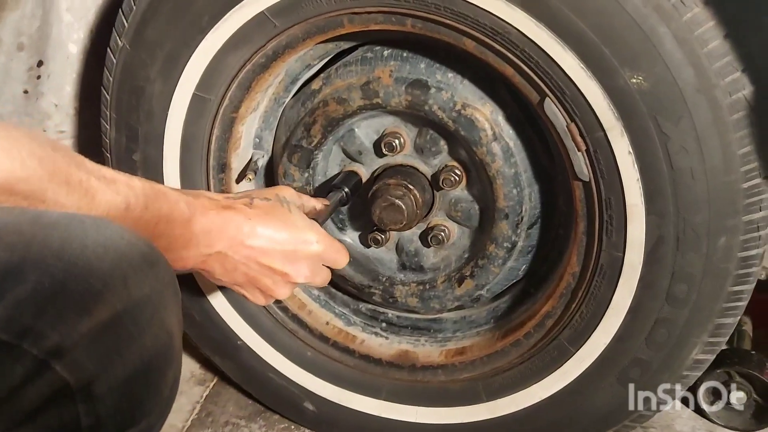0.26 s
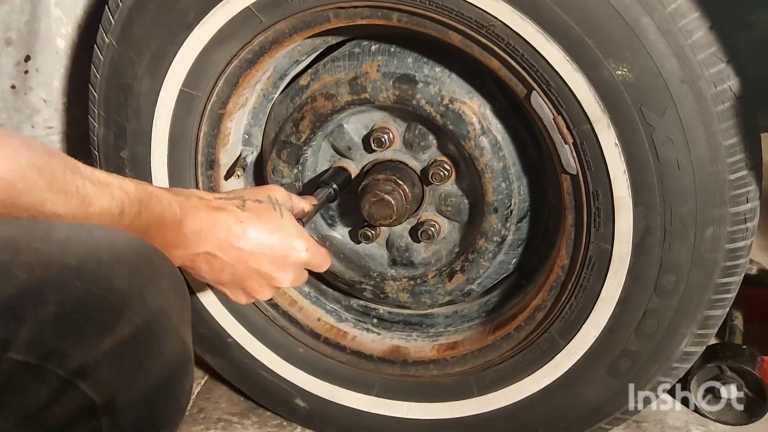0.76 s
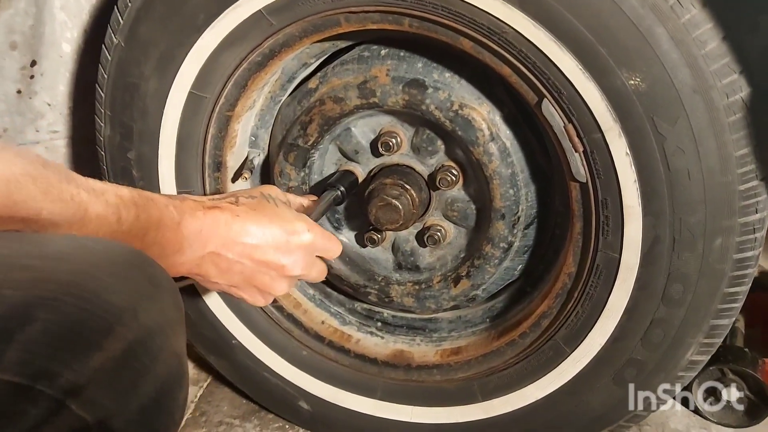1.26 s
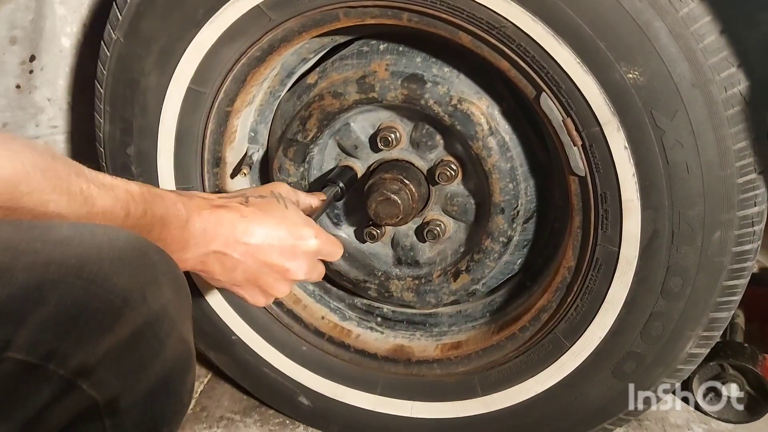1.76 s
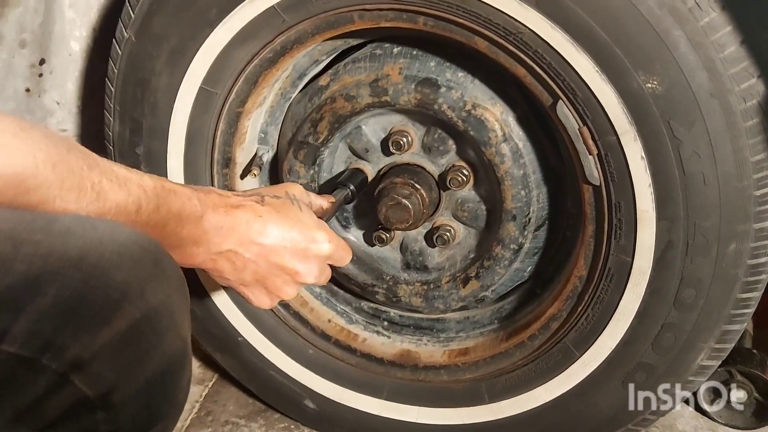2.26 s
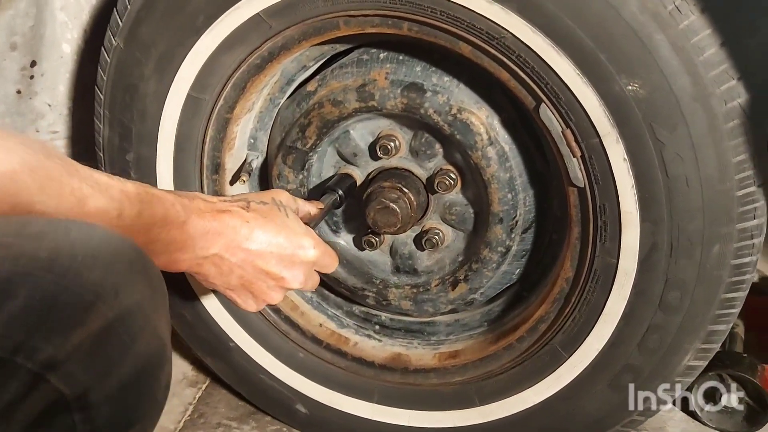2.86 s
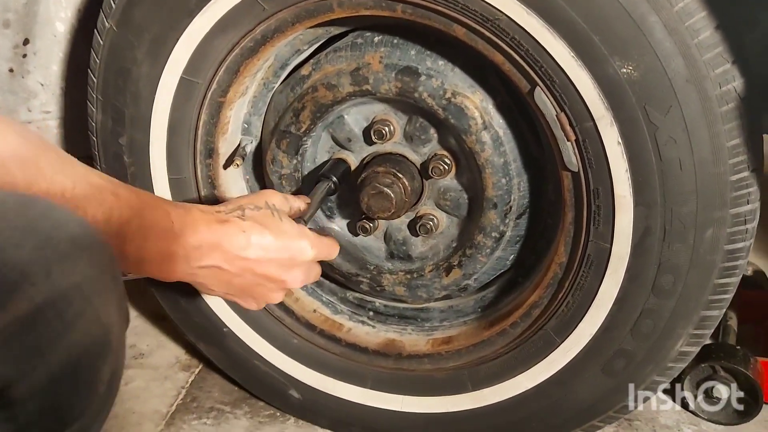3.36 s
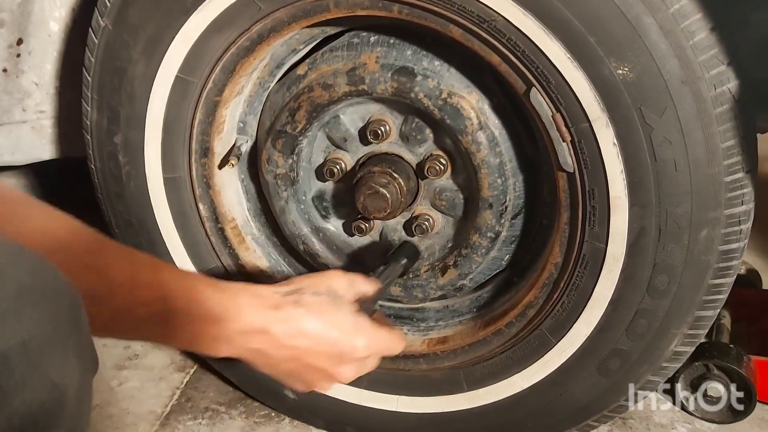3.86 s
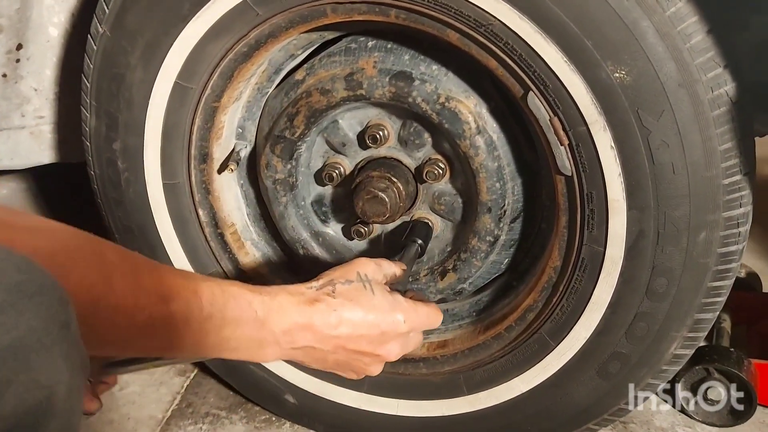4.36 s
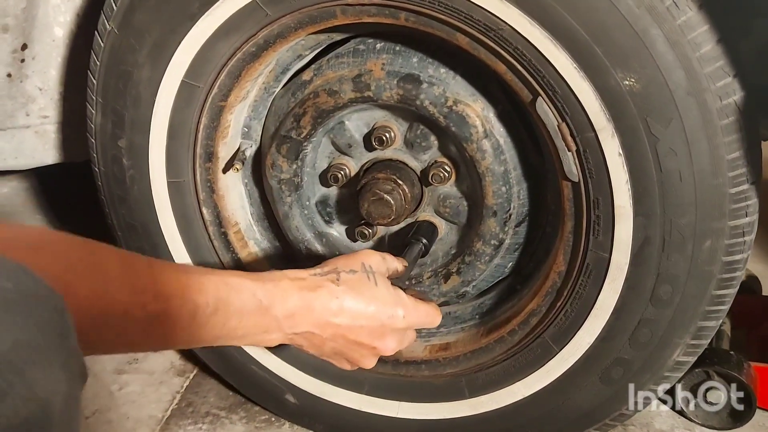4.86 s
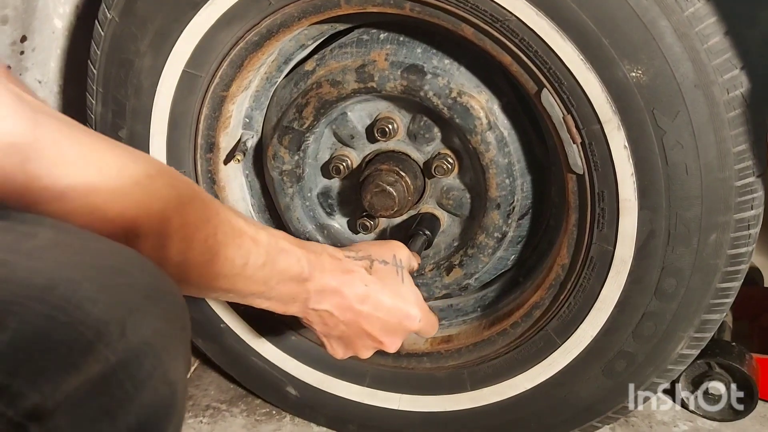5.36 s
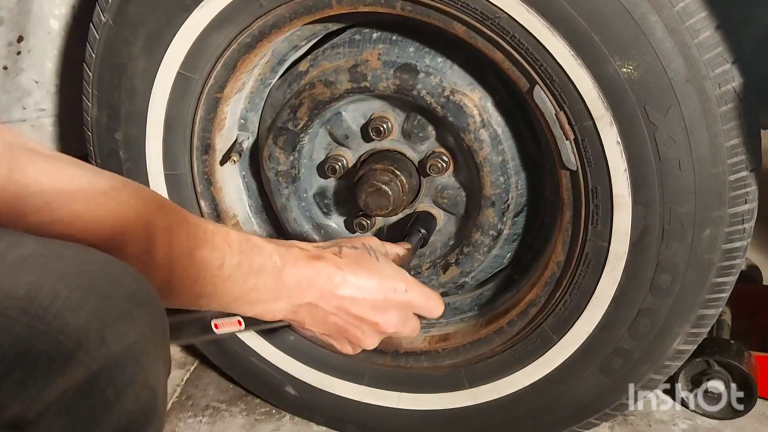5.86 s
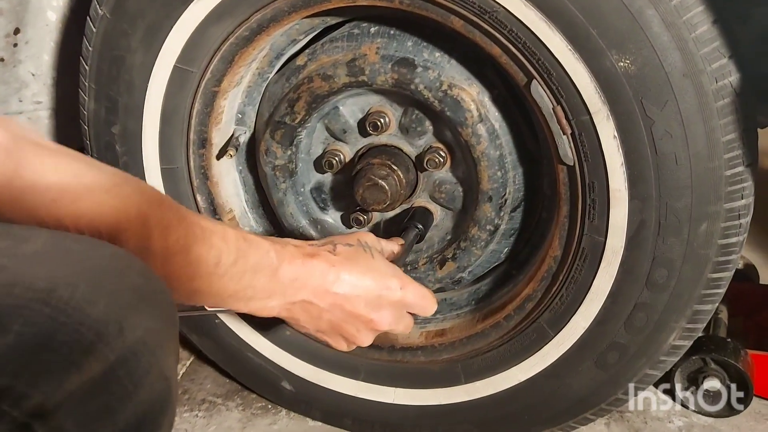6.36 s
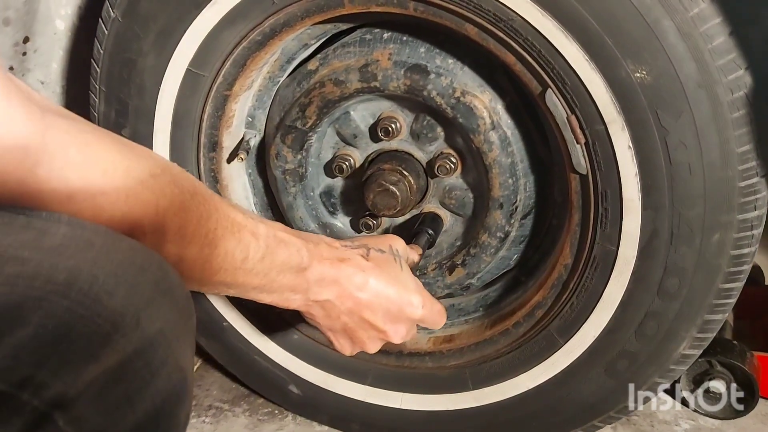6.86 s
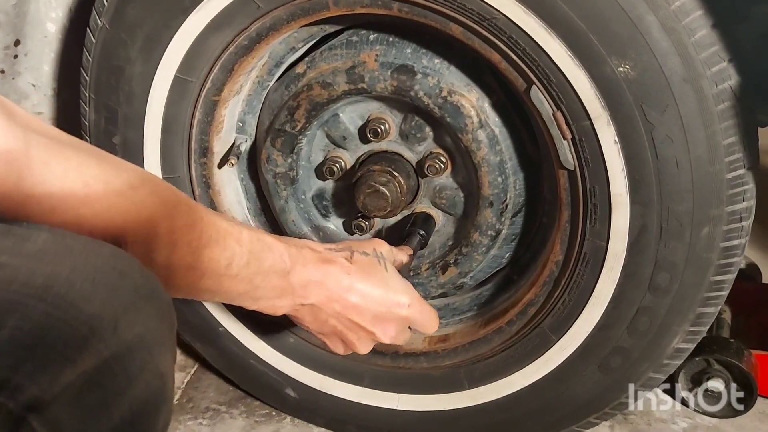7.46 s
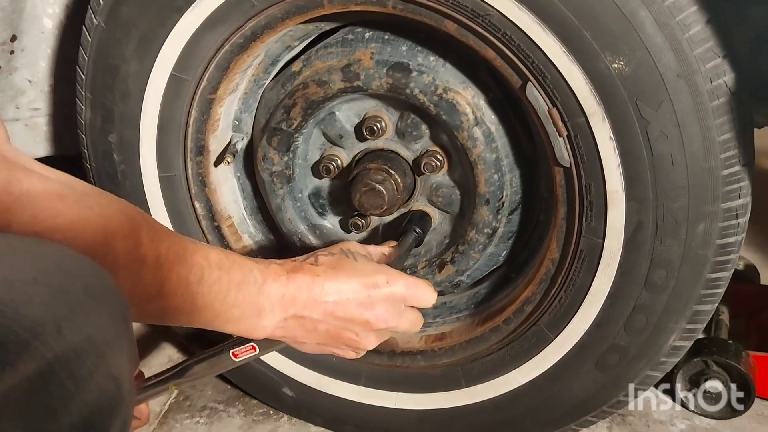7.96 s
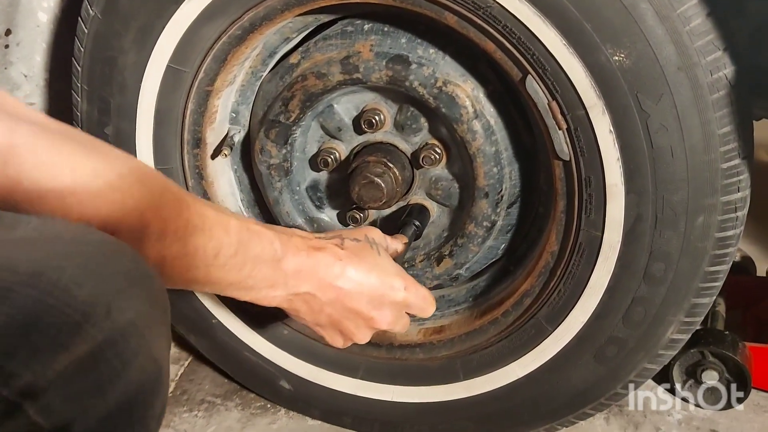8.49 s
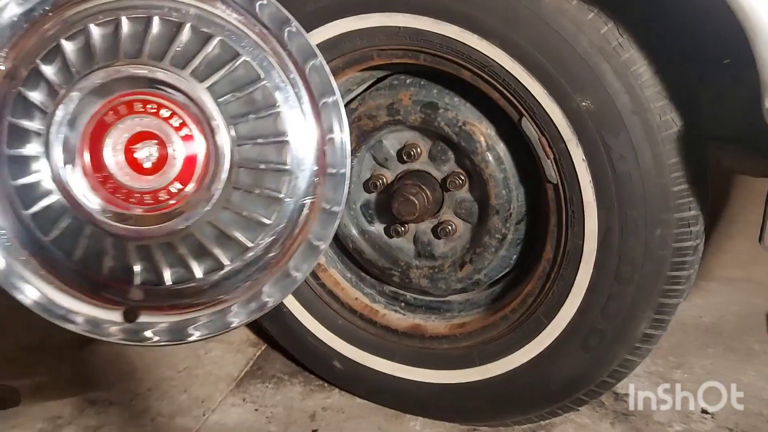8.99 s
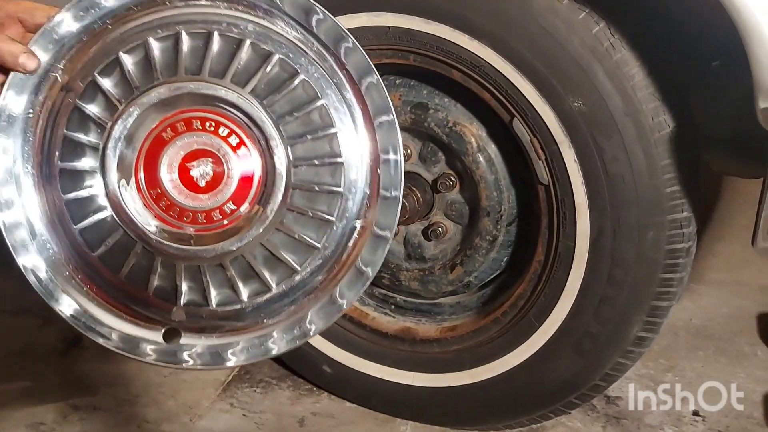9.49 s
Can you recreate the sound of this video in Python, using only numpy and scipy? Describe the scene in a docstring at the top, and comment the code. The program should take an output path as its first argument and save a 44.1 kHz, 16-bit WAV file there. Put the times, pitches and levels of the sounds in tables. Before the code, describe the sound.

Sharp metallic wrench clicks and hard steel clanks on a car wheel over faint traffic wash, then light hub cap rattles and a low engine drone.

```python
"""A click-type wrench tightens the nuts of a steel car wheel in an open garage; later a hub cap is knocked.
Pawl and socket are dying chatters of noise that ring crowds of steel modes; heavy blows thump the tyre.
Low rim modes and dull knocks are struck resonators; diffuse echoes are noise dying band by band.
The worker's moves and the traffic wash are shaped noise; an engine drones as a throbbing near sine.
A short silence separates the two scenes."""
import sys
import numpy as np
from scipy import signal
from scipy.io import wavfile
from scipy.ndimage import uniform_filter1d

SR = 44100
rng = np.random.default_rng(int(sys.argv[2]) if len(sys.argv) > 2 else 0)


def pcm_store(signal):
    """Save signal as 16-bit PCM."""
    levels = np.round(np.clip(np.atleast_2d(signal), -1, 1) * 32767)
    wavfile.write(sys.argv[1], SR, levels.astype(np.int16).T)


N = 428916

# crowds of close modes of wrench and wheel: (f/Hz, width/Hz, level/dB)
STEEL_CROWDS = [(1870, 170, -4), (2210, 220, -3), (2870, 150, -9), (5100, 250, -7), (5900, 200, -9),
                (8780, 400, -9), (10900, 500, -11), (3666, 90, -8), (4100, 140, -12), (4400, 200, -2),
                (4850, 100, -10), (7230, 170, -2), (7680, 150, -6)]
STEEL_T60_S = 0.23
# the pause between the scenes: (start t/s, end t/s)
PAUSE_S = (8.892, 8.989)
CREST = 1.94   # peak over rms of a noisy contact
KNOCK_LEAN_DB = 1.5   # left over right, for knocks, rim and boom
STEP = 40   # samples between the values of a slow curve
SIDES = np.array([[1], [-1]])   # sign of a difference signal at the left and right port


def amp(db):
    """Level definition: the amplitude ratio of a level in dB."""
    return 10 ** (np.asarray(db) / 20)


def rms_one(x):
    """Power normalisation: scaled to rms 1."""
    return x / np.sqrt(np.mean(x ** 2) + 1e-20)


def peak_one(x):
    """Peak normalisation: scaled to peak 1."""
    return x / np.abs(x).max()


def fitted_to(x, shape):
    """Crest factor: noise scaled by its rms so that its peaks typically touch the envelope."""
    return x * np.sqrt(np.mean(shape ** 2) / np.mean(x ** 2)) / CREST


def lean(db):
    """Intensity stereo: left and right gains of a level difference."""
    return amp(db / 2 * SIDES)


def add(out, s, sound):
    """Superposition: mixes a stereo sound in at time s."""
    at = round(s * SR)
    out[:, at:at + sound.shape[1]] += sound[:, :N - at]


def in_time(tables):
    """Linear interpolation: columns of consecutive curve tables, one value a sample."""
    s, *columns = np.vstack(tables).T
    return [np.interp(np.arange(N) / SR, s, c) for c in columns]


def at_hz(points, hz):
    """Logarithmic pitch scale: a spectrum read on a log-frequency axis."""
    f, value = np.array(points).T
    return np.interp(np.log(hz), np.log(f), value)


def dying(t60, attack_s):
    """Exponential decay: half a second of quick rise and fall; a t60 below 4 ms counts as 4 ms."""
    t = np.arange(SR // 2) / SR
    return (1 - np.exp(-t / attack_s)) * amp(-60 * t / max(t60, .004)) + 1e-18


def band(x, low_hz, high_hz):
    """Band limitation: Butterworth band-pass."""
    return signal.sosfilt(signal.butter(2, [low_hz, high_hz], "band", fs=SR, output="sos"), x)


def resonance(x, hz, width_hz):
    """Damped resonance: two poles, gain 1 on top."""
    r = np.exp(-np.pi * width_hz / SR)
    feedback = [1, -2 * r * np.cos(2 * np.pi * hz / SR), r * r]
    return signal.lfilter((1 - r * r) / 2 * np.array([1, 0, -1]), feedback, x)


def ring(force, modes, spread_db):
    """Modal superposition: the force sets every mode ringing, with strengths new for each blow."""
    out = 0
    for (hz, db, t60), luck in zip(modes, rng.standard_normal(len(modes))):
        r, w = amp(-60 / (t60 * SR)), 2 * np.pi * hz / SR
        mode = signal.lfilter([0, np.sin(w)], [1, -2 * r * np.cos(w), r * r], force)
        out = out + amp(db + spread_db * luck) * mode
    return peak_one(out)


def drift(rate):
    """Low-passed random fluctuation of spread 1, a value every STEP samples."""
    r = np.exp(-2 * np.pi * rate * STEP / SR)
    lead_in = 2000
    slow = signal.lfilter([1], [1, -2 * r, r * r], rng.standard_normal(N // STEP + lead_in + 1))
    return rms_one(slow[lead_in:lead_in + len(range(0, N, STEP))])


def layered_noise(layers, patchy_db):
    """Power addition of incoherent layers (spectrum, level curve) in flickering half-octave stereo bands."""
    # left-right correlation: (f/Hz, correlation)
    likeness = [(60, 0.98), (180, 0.92), (550, 0.43), (1650, -0.27), (4970, 0.13), (15000, -0.07)]
    # left over right: (f/Hz, level/dB)
    balance = [(60, 1), (180, 1.5), (550, 1.5), (1650, 0.5), (4970, -3.5), (15000, 3.5)]
    edges = 25 * 2 ** np.arange(0, 9.6, .5)
    centres = np.sqrt(edges[1:] * edges[:-1])
    widths = np.diff(edges) / (SR / 2)
    powers = [amp(2 * db[::STEP]) / np.sum(amp(2 * at_hz(shape, centres)) * widths) for shape, db in layers]
    out, white = 0, rng.standard_normal((2, 2, N))
    for k, hz in enumerate(centres):
        mid, side = band(white[k % 2], edges[k], edges[k + 1])
        alike = np.clip(at_hz(likeness, hz), -.99, .99)
        power = sum(p * amp(2 * at_hz(shape, hz)) for (shape, _), p in zip(layers, powers))
        gain = np.sqrt(power) * amp(patchy_db * drift(9.8))
        pair = np.sqrt(1 + alike) * mid + np.sqrt(1 - alike) * side * SIDES
        smooth_gain = np.interp(np.arange(N) / STEP, np.arange(len(gain)), gain)
        out = out + smooth_gain * lean(at_hz(balance, hz)) * pair
    return out


def worker(*floors_db):
    """Power addition: bell-shaped swells of shuffle, rustle and swish over what is always there."""
    # moves: (middle t/s, spread/s, shoes and knees level/dB, clothes level/dB, fine swish level/dB)
    moves = [(0.05, 0.094, -74, -76, -73), (0.42, 0.25, -79, -80, -70.5), (0.56, 0.12, -54, -65, -76),
             (1.02, 0.071, -65, -69.5, -62.5), (1.42, 0.03, -58.5, -74, -69),
             (2.62, 0.069, -60.5, -64, -78.5), (3.45, 0.04, -58.5, -67, -91),
             (3.62, 0.088, -82, -73.5, -73), (3.877, 0.06, -53.5, -66.5, -70.5),
             (4.522, 0.11, -75, -66, -67.5), (5.23, 0.13, -76, -60, -62), (6.449, 0.078, -54, -78, -89),
             (7.67, 0.022, -75, -75, -73), (7.941, 0.1, -64.5, -74, -73), (8.689, 0.11, -77, -71, -70),
             (9.72, 0.11, -60.5, -68, -70.5)]
    t, (s, spread, *levels) = np.arange(N) / SR, np.transpose(moves)
    bells = np.exp(-((t[::STEP] - s[:, None]) / spread[:, None]) ** 2)
    curves = []
    for floor, db in zip(floors_db, levels):
        swell = np.interp(t, t[::STEP], amp(2 * db) @ bells)
        curves.append(10 * np.log10(amp(2 * floor) + swell))
    return curves


def drone_curves():
    """Amplitude and frequency modulation: pitch and level of an engine that swells, fades and returns louder."""
    # engine before and after the pause: two lists of (t/s, f/Hz, level/dB)
    before, after = [
        [(5.8, 67, -47.5), (6.1, 67.6, -45.5), (6.75, 64.8, -45.5), (7.05, 65.8, -55.5), (7.6, 66.5, -62.5)],
        [(9.0, 69.4, -40.5), (9.2, 69.6, -36), (9.63, 70.6, -38), (9.67, 68.4, -47), (9.72, 70, -41)],
    ]
    silent_db = -80
    fade_in = [(before[0][0] - .3, before[0][1], silent_db)]
    fade_out = [(before[-1][0] + 0.19, before[-1][1], silent_db), (PAUSE_S[0], after[0][1], silent_db)]
    return in_time([fade_in, before, fade_out, after])


def surroundings():
    """Spectral shaping: traffic, rumble, the worker's moves and engine roar as layers of coloured noise."""
    # before and after the pause: two lists of
    # (t/s, traffic wash level/dB, rumble level/dB, low middle level/dB, treble level/dB)
    outside = [
        [(0.0, -60, -62, -57, -74), (0.42, -56.5, -64.5, -55, -62.5), (0.71, -59.5, -59.5, -64, -87),
         (1.34, -60, -61, -60.5, -71.5), (1.7, -61.5, -59, -66.5, -89), (2.47, -58, -62, -67.5, -84.5),
         (2.79, -63, -52.5, -67.5, -85), (3.26, -64, -60, -68.5, -79), (3.78, -65, -70.5, -65, -73.5),
         (4.7, -55.5, -51, -56.5, -66), (5.17, -52, -58.5, -61.5, -67), (5.69, -56, -54, -58.5, -69),
         (6.26, -54, -52.5, -56.5, -65.5), (6.53, -54, -51.5, -61, -63.5), (7.22, -58.5, -56, -63.5, -76),
         (7.79, -57, -58.5, -63.5, -71.5), (8.23, -61.5, -61, -69.5, -78), (8.88, -55.5, -57, -67, -67.5)],
        [(9.0, -53.5, -50.5, -55.5, -66), (9.224, -56.5, -56, -59, -68), (9.612, -52.5, -46.5, -51, -74),
         (9.72, -64, -44, -56, -49)],
    ]
    # relative power density of each layer: (f/Hz, level per Hz/dB)
    wash = [(150, -36), (250, 1), (393, -23), (524, -18), (681, -9.5), (735, 7.5), (1070, -4), (1700, 5),
            (2610, -16.5), (3270, -25.5), (5000, -28), (6500, -57), (11000, -120)]
    rumble = [(25, -29), (45, 7), (65, 26), (100, 20), (140, 14), (200, -45.5)]
    shuffle = [(90, -14.5), (150, -3), (250, -4.5), (480, -8.5), (800, -5.5), (1500, -36.5)]
    rustle = [(1500, -32), (3000, 17), (4500, 5), (7000, -1), (9000, -8), (13000, -21.5)]
    swish = [(5000, -23), (8500, -0.5), (12000, -8.5), (16000, -6)]
    roar = [(300, -1), (600, -2), (800, 9.5), (950, -9), (1300, -66)]
    hiss_db = -81.5   # finest treble between the moves
    wash_db, rumble_db, low_db, treble_db = in_time(outside)
    shuffle_db, rustle_db, swish_db = worker(low_db, treble_db, hiss_db + 0 * low_db)
    roar_db = drone_curves()[1] - 17
    layers = [(wash, wash_db), (rumble, rumble_db), (shuffle, shuffle_db),
              (rustle, rustle_db), (swish, swish_db), (roar, roar_db)]
    return layered_noise(layers, patchy_db=2.09)


def drone():
    """Periodic and random excitation: the engine's strongest order, throbbing, and its roar's hollow band."""
    pipe_hz, pipe_width_hz, pipe_db = 800, 140, -14   # level relative to the drone
    hz, db = drone_curves()
    hollow = resonance(rng.standard_normal((2, N)), pipe_hz, pipe_width_hz)
    hollow = rms_one(resonance(hollow, pipe_hz, 2 * pipe_width_hz))
    throb_db = uniform_filter1d(np.repeat(drift(8), STEP)[:N], size=200)
    order = np.sqrt(2) * amp(throb_db) * np.sin(2 * np.pi * np.cumsum(hz) / SR)
    return amp(db) * (order * lean(2.1) + amp(pipe_db) * hollow)


def garage(x):
    """Diffuse reverberation: noise that dies band by band, unrelated on the two sides."""
    # reverberation time: (f/Hz, t60/s)
    reverb_t60 = [(125, 0.17), (500, 0.42), (2000, 0.27), (5000, 0.2), (10000, 0.12), (16000, .2)]
    t, edges = np.arange(SR // 2) / SR, 60 * 2. ** np.arange(9)
    white = rng.standard_normal((2, len(t))) * (1 - np.exp(-t / 0.0029))
    tail = 0
    for lo, hi in zip(edges, edges[1:]):
        tail = tail + band(white, lo, hi) * amp(-60 * t / at_hz(reverb_t60, np.sqrt(lo * hi)))
    tail /= np.sqrt(np.sum(tail ** 2, axis=1, keepdims=True))
    return signal.fftconvolve(x, tail, axes=1)[:, :N]


def ticks():
    """Impulsive excitation: faint ticks of play in the socket, tiny dry contacts with a brief ring."""
    # ticks: (t/s, peak level before the lean/dB, f/Hz)
    play = [(0.596, -43, 1110), (0.899, -46.5, 1010), (1.226, -51, 3640), (3.171, -55, 3640),
            (3.518, -52, 3530), (5.77, -54, 7000), (6.253, -41, 845), (6.469, -51, 8200),
            (7.456, -63, 5068), (7.614, -48.5, 6300)]
    out = np.zeros((2, N))
    for s, db, hz in play:
        tap = dying(0.035, .0005) * rng.standard_normal(SR // 2)
        tick = peak_one(resonance(tap, hz, .14 * hz)) + .5 * peak_one(band(tap, hz / 2, hz * 1.4))
        add(out, s, amp(db) * lean(-2.8) * peak_one(tick))
    return out


def knocks():
    """Damped resonance: a soft contact of knee, hand or handle shakes one broad mode, which dies away; the row
    at 6.405 s instead lets a band near 800 Hz ring on for about half a second."""
    # dull knocks, and at 6.405 s a long ring near 800 Hz: (t/s, level/dB, f/Hz, t60 of the shaking/s)
    dull = [(0.177, -35, 147, 0.14), (0.222, -27.5, 192, 0.054), (0.279, -34, 173, 0.08),
            (0.398, -38, 280, 0.059), (0.49, -41, 420, 0.05), (0.52, -37, 298, 0.059),
            (0.595, -33, 193, 0.15), (0.897, -33, 160, 0.11), (0.925, -33.5, 254, 0.088),
            (0.939, -34, 67, 0.16), (0.982, -38, 61, 0.37), (1.04, -35.5, 83, 0.19),
            (3.81, -40.5, 148, 0.17), (3.86, -40, 200, 0.15), (5.739, -40, 634, 0.094),
            (6.324, -23, 175, 0.17), (6.256, -35, 793, 0.1), (6.405, -39.5, 804, 0.5),
            (9.702, -15.5, 138, 0.19), (6.002, -35, 356, 0.069), (9.682, -21.5, 332, 0.065),
            (9.698, -17, 166, 0.062)]
    out = np.zeros((2, N))
    for s, db, hz, t60 in dull:
        shape = dying(t60, 0.0044)
        shake = band(shape * rng.standard_normal(len(shape)), 35, 900)
        shake = fitted_to(resonance(shake, hz, 0.13 * hz) + 0.066 * shake, shape)
        struck = ring(dying(0.0038, 0.00044), [(hz, 0, 0.71 * t60)], spread_db=0)
        add(out, s, amp(db) * lean(KNOCK_LEAN_DB) * (shake + 0.55 * struck))
    return out


def jolts():
    """Structure-borne shock: two heavy blows move mostly the left port out and back; air in the tyre booms."""
    # blows: (t/s, kick level/dB, direction, boom level/dB)
    shocks = [(2.538, -22, -1, -23), (2.89, -4, 1, -26)]
    # air in the tyre: (f/Hz, level/dB, t60/s)
    tyre_air = [(113, 0, .8), (125, -5, .6), (156, -2, .3), (185, -8, .2)]
    kick, swing = (385, 0, 0.0051), (53, 0, 0.035)   # f/Hz, level/dB, t60/s
    swing_lag_s, swing_db = 0.0014, -3.5   # the slow swing back, after and relative to the quick kick
    out, push = np.zeros((2, N)), dying(0.0026, 0.00033)
    for s, db, direction, boom_db in shocks:
        left = np.sign(direction) * amp(db) * np.array([[1], [.05]])
        add(out, s, left * ring(push, [kick], spread_db=0))
        add(out, s + swing_lag_s, -amp(swing_db) * left * ring(push, [swing], spread_db=0))
        boom = ring(dying(.012, .002), tyre_air, spread_db=1.5)
        add(out, s, amp(boom_db) * lean(KNOCK_LEAN_DB) * boom)
    return out


def rim():
    """Modal excitation: the bar's short push rings the low rim modes, most near the liveliest region."""
    # low modes of the steel rim: (f/Hz, level before the fall/dB, t60 before the knock's factor/s)
    rim_modes = [(490, 0, 0.1), (451, -3, 0.17), (472, -23, .9), (648, -1, 0.11), (797, -5, 0.08),
                 (918, -3, .08), (1064, -3, 0.06), (1200, -5, .05), (324, -14, .05), (545, -5, .06)]
    # the bar knocks the rim: (t/s, level/dB, factor on t60, liveliest f/Hz)
    bar_knocks = [(2.553, -26, 1.65, 456), (2.906, -24.5, 1.53, 450), (3.401, -41.5, 0.88, 500),
                  (4.09, -38.5, 0.91, 460), (4.214, -39, 1.4, 650), (4.222, -37, 1.2, 480),
                  (4.522, -26, 1.1, 653), (4.531, -25, 1.4, 520), (4.561, -32, .7, 460),
                  (4.596, -35, .9, 460), (4.284, -36.5, 1.6, 700), (4.335, -36, 1, 550),
                  (6.325, -25.5, 0.94, 805), (6.334, -23.5, 0.91, 500)]
    fall_db = 10   # per octave away from the liveliest region
    out = np.zeros((2, N))
    for s, db, free, lively_hz in bar_knocks:
        modes = []
        for hz, mode_db, t60 in rim_modes:
            octaves = abs(np.log2(hz / lively_hz))
            modes.append((hz, mode_db - fall_db * octaves, t60 * max(free, .1)))
        add(out, s, amp(db) * lean(KNOCK_LEAN_DB) * ring(dying(0.004, 0.0003), modes, spread_db=2))
    return out


def crowd_ring(wide, crowds, lively_hz, t60, between_db):
    """High modal density: close modes beat into rough bands; the liveliest region rings most and longest."""
    lively_db, lively_octaves, lively_longer = 12, .09, .5   # gain, reach and share of longer ringing
    ring_spread_db = 3   # each blow wakes the crowds differently
    out, power = 0, 0
    for (hz, width_hz, db), luck in zip(crowds, rng.standard_normal(len(crowds))):
        octaves = abs(np.log2(hz / lively_hz))
        near = np.exp(-(octaves / lively_octaves) ** 2)
        gain = amp(db + ring_spread_db * luck - 2.1 * octaves + lively_db * near)
        decay = dying(t60 * (1 + lively_longer * near), 0.0014)
        out = out + gain * decay * rms_one(resonance(wide, hz, width_hz))
        power = power + gain ** 2
    # countless weak modes between the crowds
    between = rms_one(band(wide, lively_hz / 2, min(1.74 * lively_hz, 15000)))
    between = amp(between_db) * dying(t60, 0.0021) * between
    return (out / np.sqrt(power) + between) / np.sqrt(1 + amp(2 * between_db))


def blows(table, crowds, ring_t60, between_db):
    """Impact excitation: a dying chatter of uneven micro-impacts cracks, rings metal and thumps the tyre."""
    # tyre and axle: (f/Hz, level/dB, t60/s)
    tyre_modes = [(67.4, 4.5, 0.009), (118, -23, 0.47), (165, -13, 0.17), (270, -3.5, 0.019),
                  (300, -9.5, 0.065)]
    thump_lean_db, edge_lean_db = 0.5, 9.5   # tyre nearer the left port, which also faces the finest treble
    out = np.zeros((2, N))
    for s, bright_db, edge_db, body_db, thump_db, t60, ring_db, lively_hz, pan_db in table:
        shape = dying(t60, 0.00091)
        grit, other, unevenness, shimmer, glimmer = rng.standard_normal((5, len(shape)))
        # the steel radiates unevenly to the ports
        chatter = shape * amp(3.8 * unevenness) * (grit + 0.72 * other * SIDES)
        bright = fitted_to(band(chatter, 2290, 10840), shape)
        body = fitted_to(band(chatter, 510, 3770), shape)
        edge = lean(edge_lean_db) * fitted_to(band(chatter, 8000, 16000), shape)
        ringing = crowd_ring(shimmer + glimmer * SIDES, crowds, lively_hz, ring_t60, between_db) / CREST
        metal = bright + amp(body_db) * body + amp(edge_db) * edge + amp(ring_db) * ringing
        # rubber takes the blow as one soft push
        thump = -amp(thump_db) * ring(dying(0.0033, 0.00013), tyre_modes, spread_db=3.5)
        add(out, s, amp(bright_db) * (lean(pan_db) * metal + lean(thump_lean_db) * thump))
    return out


def cap_contacts():
    """Impact excitation of a thin shell: knocks on the hub cap ring its own narrow crowds of modes."""
    # crowds of close modes of the hub cap: (f/Hz, width/Hz, level/dB)
    cap_crowds = [(1760, 50, -4), (2090, 76, -7), (2550, 50, -10), (2890, 25, 0), (2990, 25, -2),
                  (3430, 40, -3), (4190, 45, -9), (4720, 90, -12), (5050, 90, -8), (5330, 90, -9),
                  (5850, 60, -14)]
    # knocks: (t/s, bright peak level/dB, then relative to it top edge level/dB, body level/dB,
    # thump level/dB, ringing level/dB, and liveliest f/Hz)
    cap_table = [(9.338, -32.5, -19, -1, -5, -2.5, 3370), (9.347, -37.5, -15, -2, -19, 1.5, 2800),
                 (9.352, -34, -18, 9, -11, -9, 5100), (9.438, -44, -7, 13, 5, 6.5, 2160),
                 (9.489, -46, -1, 14, 14, 5.5, 2910), (9.491, -50.5, -18, 0, 6, 4, 4190),
                 (9.560, -45.5, -1, 12, -1, 6.5, 2000), (9.58, -56, -8, 4, -11, -6, 3430),
                 (9.612, -55, -6, 4, -11, 3, 2950), (9.676, -34.5, -6, 17.5, -6, 5, 2070),
                 (9.686, -32.5, -3, 16, -8, 5, 2060), (9.706, -31.5, -5, 6, -11, -1, 4200),
                 (9.716, -29, -1, -14, -20, -13, 2340)]
    chatter_t60_s, lean_db = 0.028, -2
    rows = [(*row[:5], chatter_t60_s, *row[5:], lean_db) for row in cap_table]
    return blows(rows, cap_crowds, ring_t60=0.26, between_db=-5)


def steel_contacts():
    """Impact excitation of steel: socket and bar meet nut and rim."""
    # contacts: (t/s, bright peak level/dB, then relative to it top edge level/dB, body level/dB,
    # thump level/dB, ringing level/dB, and liveliest f/Hz, left over right level/dB)
    socket_table = [(0.0, -32.5, -8, 4.5, -13, -10, 5270, -1.5), (0.373, -34, -3, -7, -16, -31, 1740, -3),
                    (2.5365, -8, -9, -5.5, -14.5, -11, 4120, 1.5),
                    (2.5502, -20.5, -8, -24, -6, -1, 7100, -3),
                    (2.5735, -23.5, -9.5, -13, -2, -3.5, 1930, -1),
                    (2.8893, -6.5, -10, -5.5, -14, -14.5, 4540, -1.5),
                    (2.915, -26, -11, -7.5, -25, 0, 3750, -2.5), (3.418, -37, -16, 3.5, -9, -10, 1830, 0),
                    (4.078, -24, -8, 0, -14, -15, 2070, -2.5), (4.2738, -34.5, -15, 3, -33, -6, 5240, -14),
                    (4.28, -23.5, -23, 0, -16.5, -13.5, 4700, 3), (4.319, -37, -10, 0, -21, -3.5, 2210, 0),
                    (4.3334, -26.5, -12, 0.5, -21, -25, 5500, 0),
                    (4.5222, -34, -11, 10.5, -14, -10.5, 4600, 0),
                    (5.843, -33.5, -6, -22, -10, -20.5, 6040, -1),
                    (6.324, -28.5, -27, 7.5, -3, -12.5, 2700, -1.5)]
    chatter_t60_s = 0.04
    rows = [(*row[:5], chatter_t60_s, *row[5:]) for row in socket_table]
    return blows(rows, STEEL_CROWDS, STEEL_T60_S, between_db=-2)


def pawl_contacts():
    """Stick-slip and snap: the pawl slips, then snaps over; first the socket grates in a run of touches."""
    # clicks: (snap t/s, snap level/dB, lead of the slip/s, slip level/dB,
    # snap left over right level/dB, snap liveliest f/Hz)
    clicks = [(1.4232, -11.5, 0.016, -21, -4.5, 5150), (5.934, -9, 0.014, -19.5, -2.5, 4900),
              (6.085, -8.5, .0246, -28, -4, 7670), (7.7756, -8.5, 0.016, -20.5, -1.5, 7870)]
    # shared by snaps, by slips: (top edge level/dB, body level/dB, thump level/dB, chatter t60/s,
    # ringing level/dB), levels relative to the bright peak; a negative t60 gives the shortest chatter
    snap = (-5, -12.5, -32, 0.0309, -24)
    slip = (-4, -7.5, -27, -0.0249, -11)
    # each grating touch: the columns of snap, then liveliest f/Hz, left over right level/dB
    grate = (-8, -2, -42, 0.0165, -15, 3600, -2)
    slip_lively_hz, slip_lean_db = 6500, 0
    grate_start_s, grate_gap_s, grate_top_s, grate_db = .0685, .0055, 0.076, -19.5
    rise_db, fall_db = 800, 219   # fall per second before and after the loudest time
    snaps = [(s, db, *snap, hz, pan_db) for s, db, _, _, pan_db, hz in clicks]
    slips = [(s - lead, db, *slip, slip_lively_hz, slip_lean_db) for s, _, lead, db, *_ in clicks]
    grating = []
    for s in grate_start_s + grate_gap_s * np.arange(13):
        below_db = max(rise_db * (grate_top_s - s), fall_db * (s - grate_top_s))
        grating.append((s, grate_db - below_db, *grate))
    return blows(snaps + slips + grating, STEEL_CROWDS, STEEL_T60_S, between_db=6)


def scene():
    """Direct sound plus reverberation: blows reach the right port late; surroundings lie under them."""
    garage_db, port_lag_s = -11.5, .00013
    direct = pawl_contacts()
    direct += steel_contacts() + cap_contacts() + knocks() + rim()
    direct[1] = np.interp(np.arange(N) - round(port_lag_s * SR), np.arange(N), direct[1])
    direct += ticks()
    return direct + amp(garage_db) * garage(direct) + surroundings() + drone() + jolts()


def record(dry):
    """Band limitation: the microphone drops the deepest bass, the pause is muted, the top is cut."""
    cutoff_hz, fade_s = 16400, 0.0019
    t = np.arange(N) / SR
    mute = np.clip(np.maximum(PAUSE_S[0] - t, t - PAUSE_S[1]) / fade_s, 3e-4, 1)
    thinned = signal.sosfilt(signal.butter(2, 45, "high", fs=SR, output="sos"), dry)
    return signal.sosfilt(signal.cheby2(12, 70, cutoff_hz, fs=SR, output="sos"), thinned * mute)


dry = scene()
out = record(dry)
pcm_store(out)
```